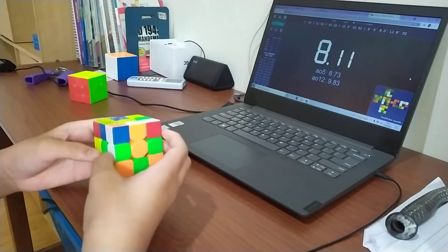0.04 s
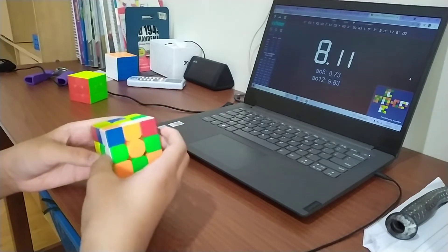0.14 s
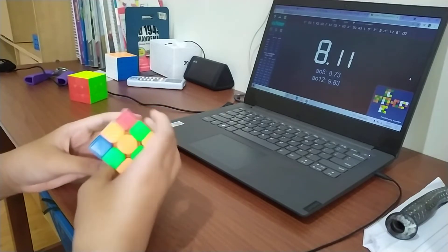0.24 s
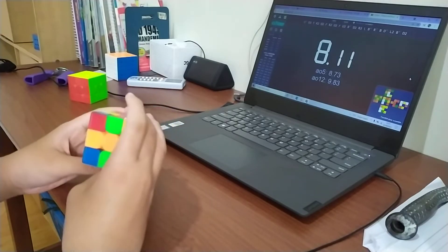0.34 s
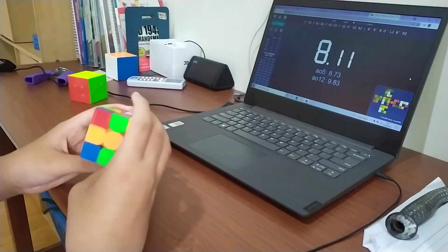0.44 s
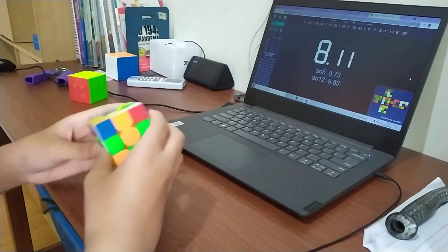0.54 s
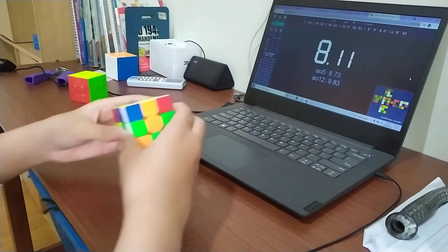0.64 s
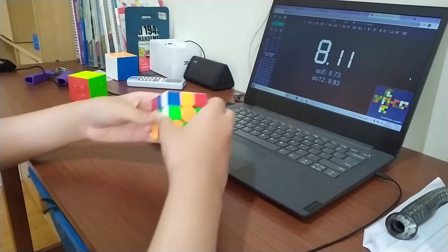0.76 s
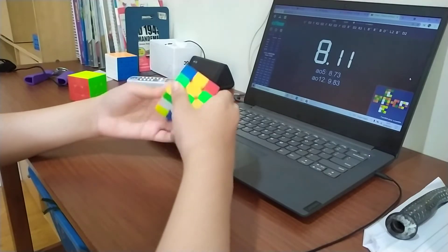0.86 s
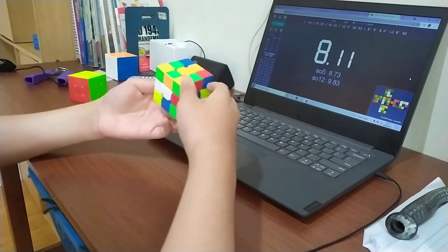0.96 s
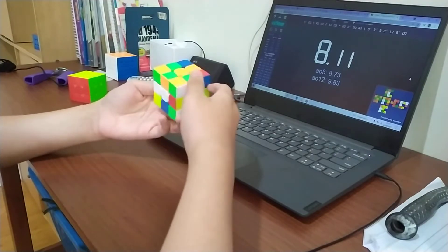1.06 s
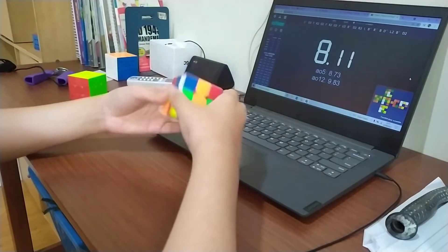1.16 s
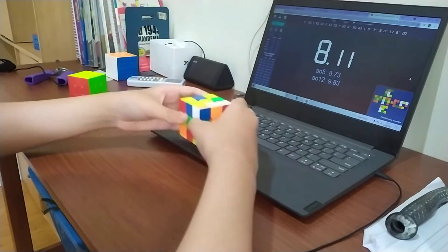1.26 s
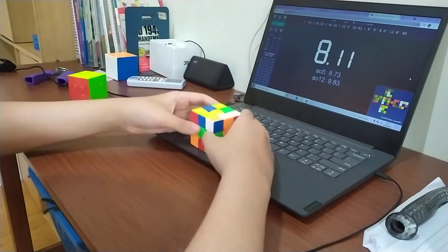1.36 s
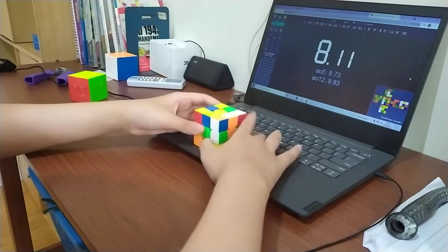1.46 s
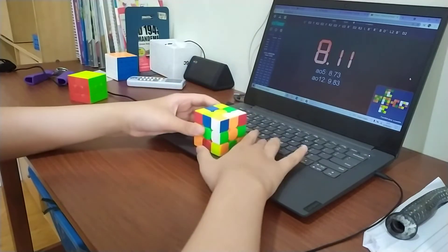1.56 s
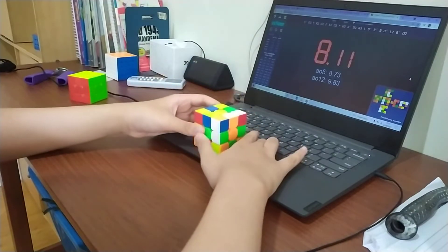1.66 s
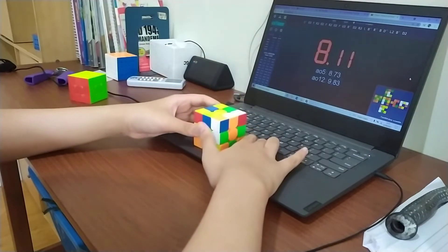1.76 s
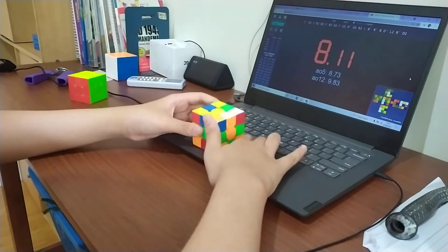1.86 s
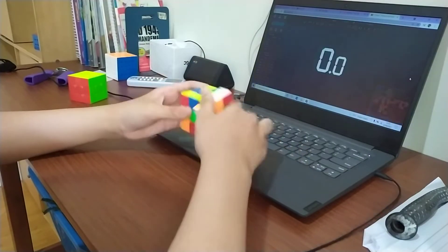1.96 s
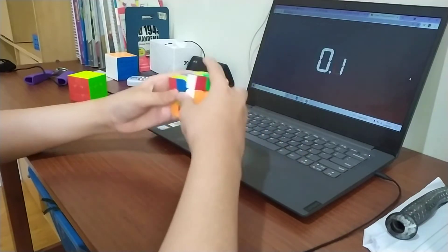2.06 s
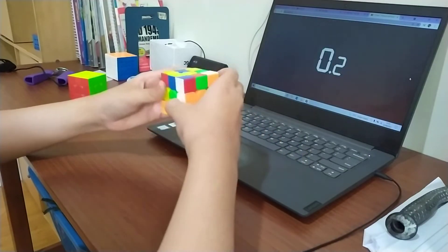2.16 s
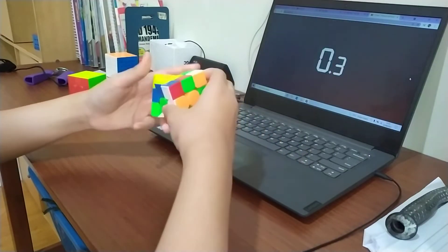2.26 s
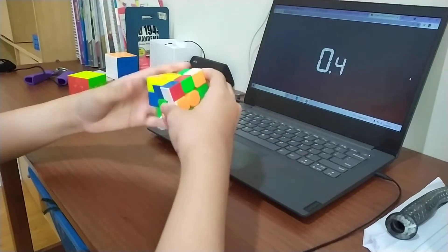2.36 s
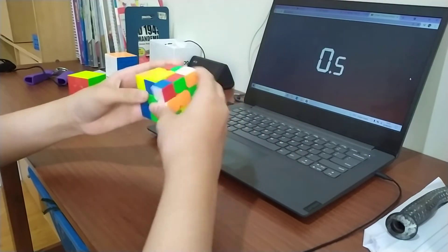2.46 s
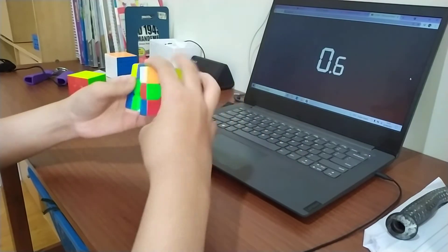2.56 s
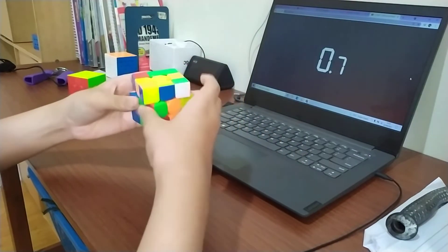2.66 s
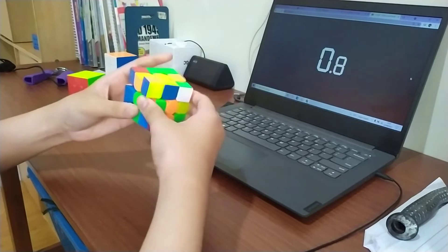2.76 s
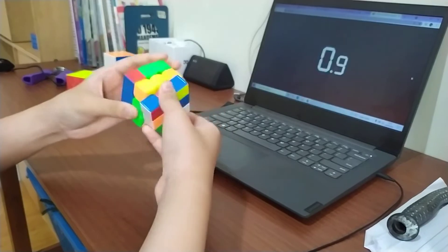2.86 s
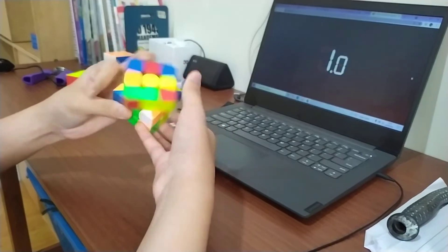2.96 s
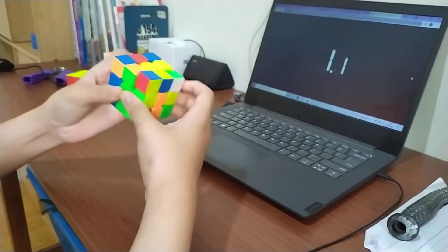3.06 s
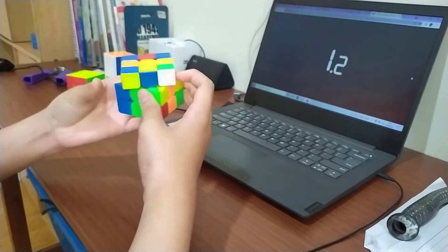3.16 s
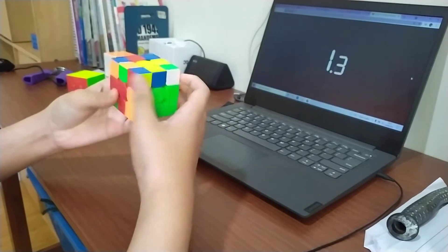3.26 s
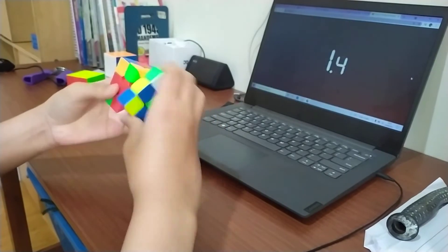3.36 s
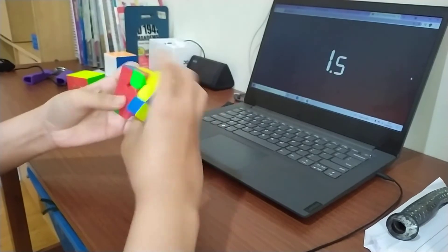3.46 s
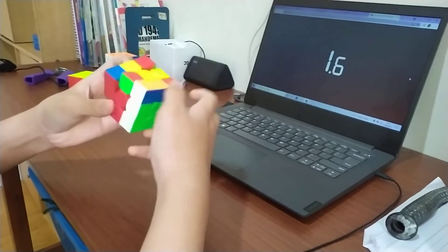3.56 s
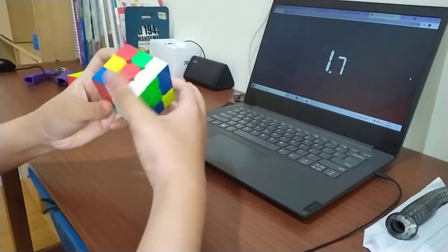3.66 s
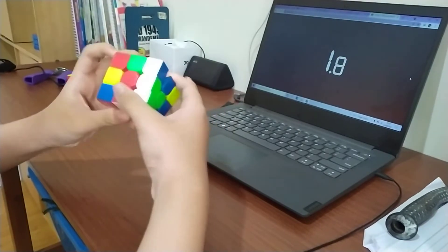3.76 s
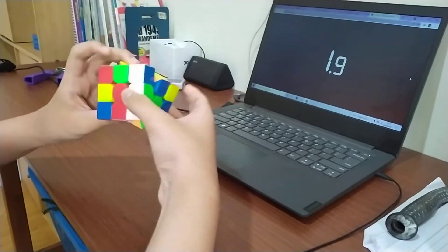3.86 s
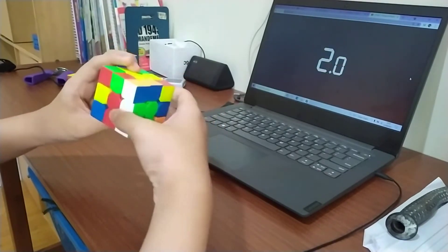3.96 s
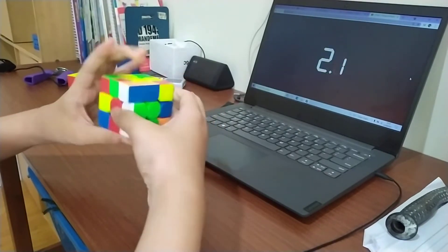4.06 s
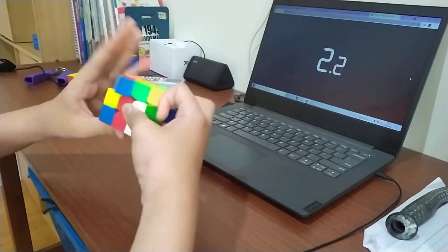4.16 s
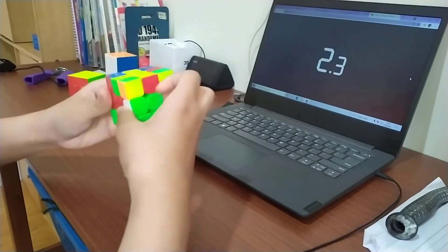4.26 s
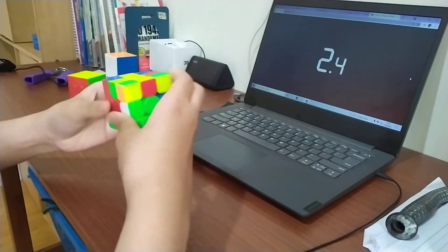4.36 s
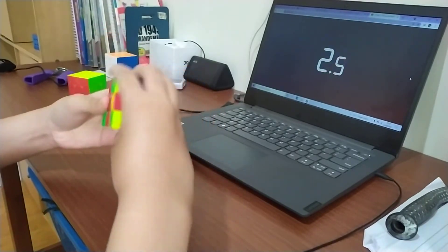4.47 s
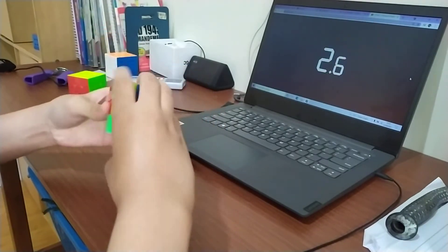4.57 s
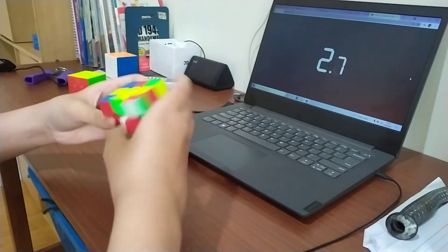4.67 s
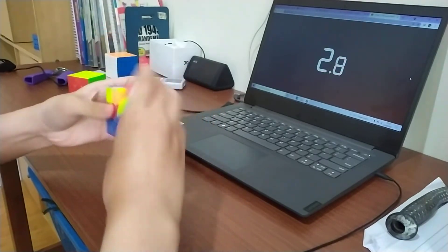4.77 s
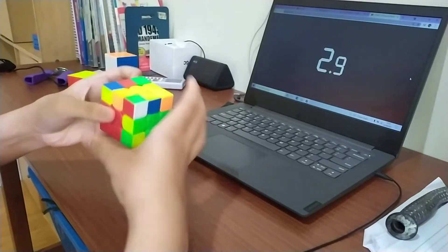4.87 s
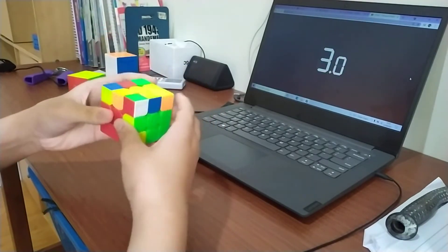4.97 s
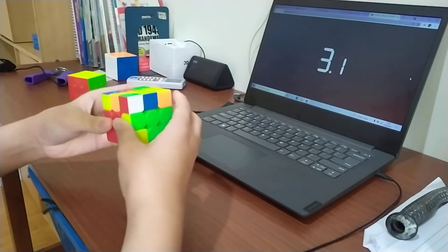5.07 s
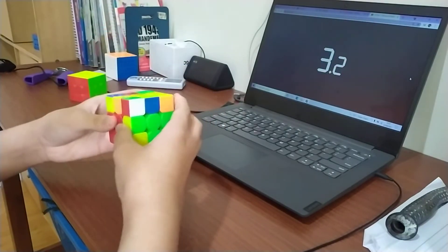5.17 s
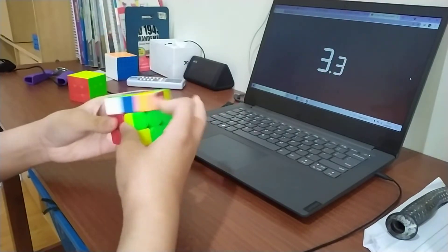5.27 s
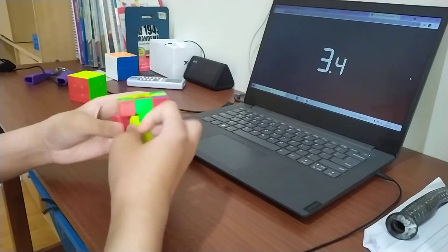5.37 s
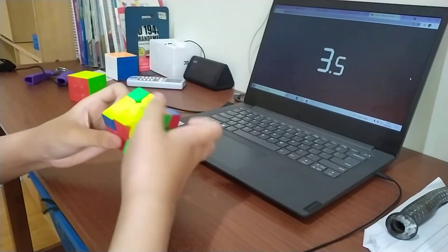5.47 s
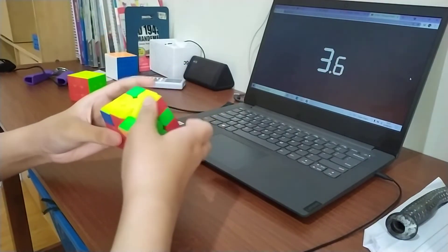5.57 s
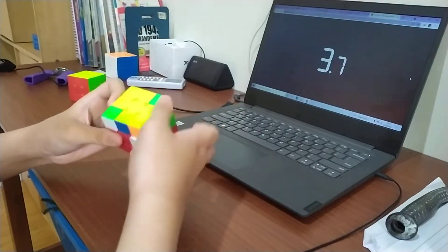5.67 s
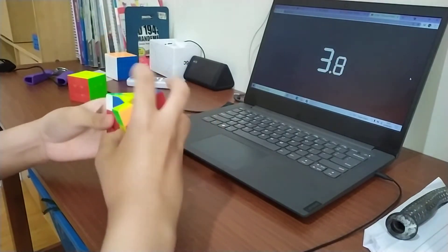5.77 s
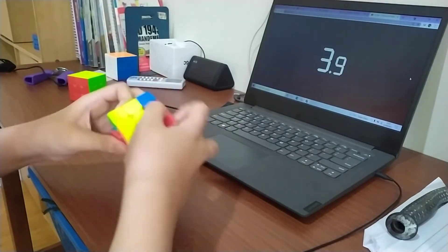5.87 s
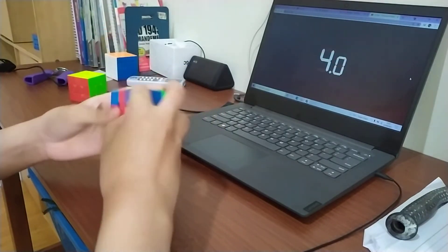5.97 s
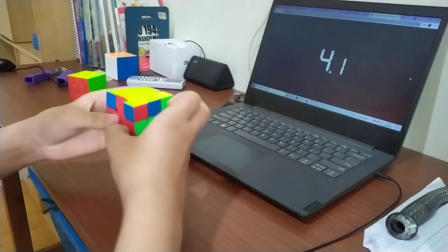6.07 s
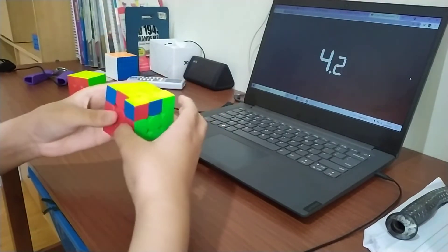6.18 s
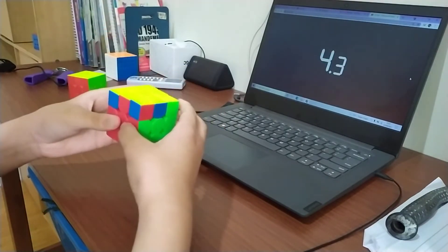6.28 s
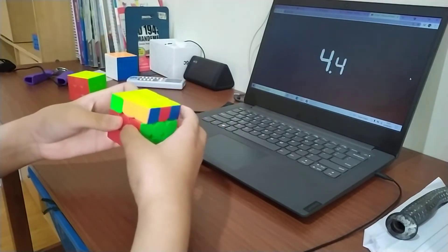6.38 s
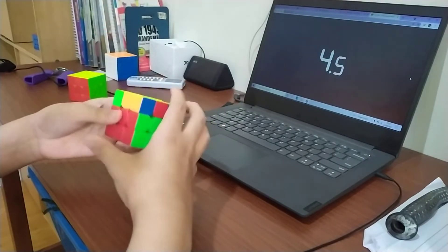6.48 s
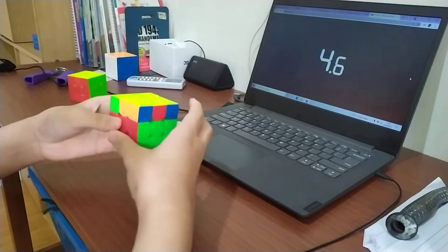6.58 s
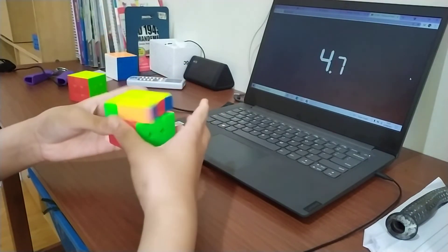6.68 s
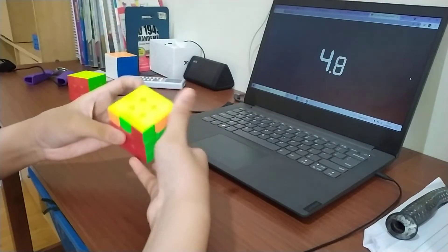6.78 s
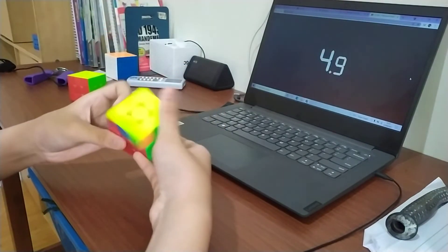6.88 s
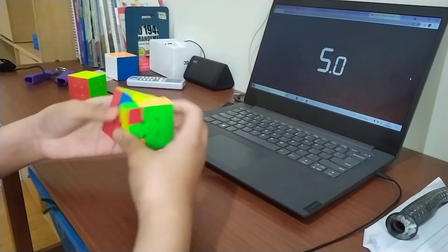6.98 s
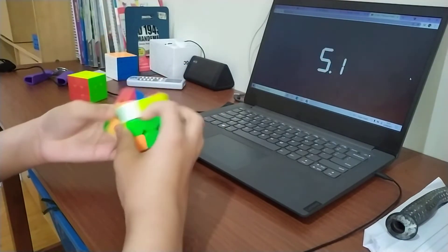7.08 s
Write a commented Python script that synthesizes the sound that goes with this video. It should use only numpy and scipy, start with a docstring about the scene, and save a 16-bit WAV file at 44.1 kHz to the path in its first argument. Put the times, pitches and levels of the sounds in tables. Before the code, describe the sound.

Quiet room rumble and faint hiss first, then a plastic puzzle cube lands on a laptop with a light clack and low thud. After a brief pause with small taps it is picked up and twisted very fast: bright, dry clicks in irregular bursts with short rattles of loose pieces. Close stereo microphone, small hard-walled room with short bright echoes.

```python
"""A plastic puzzle cube is put down on a laptop, picked up again and solved fast in a small hard-walled room.
It clacks as it lands and, later, as its pieces catch and snap home; loose pieces rattle as it is put down
and as layers slide. Both are random tiny impacts ringing through plastic; hard stops ring the cube's core.
The laptop, the desk and the cupped cube thud as ringing modes; wall echoes follow the cube.
Beneath lie room rumble and hiss, faint tones, and a motor that swells once and dies away."""
import sys
import numpy as np
from scipy import signal
from scipy.fft import rfft, irfft
from scipy.io import wavfile

SR = 44100
rng = np.random.default_rng(int(sys.argv[2]) if len(sys.argv) > 2 else 0)


def put_to_file(sound):
    """Save the sound as 16-bit audio at rate SR, in the file named by the first command-line argument."""
    columns = np.atleast_2d(sound).T  # one column per channel
    safe = np.clip(columns, -1, 1)
    whole_steps = np.round(safe * 32767)
    wavfile.write(sys.argv[1], SR, whole_steps.astype(np.int16))


N = 314400
TIME = np.arange(N) / SR
CUTOFF_HZ = 15950   # the recorded sound stops above this


# Clacks of the cube: first landing on the laptop, later pieces snapping home.
# Each row: start in seconds, level in dB (energy gathered in 1 ms, before the mix),
# chatter energy decay in ms, hollow body in dB, level thrown into the room in dB against the clack.
CUBE_CLACKS = [(1.1398, -50, .9, -5, -2), (1.3872, -30, 1.5, 14.5, -4.5), (1.3946, -36, 2.2, 20, 1.5),
               (1.404, -31, 2.8, 21, -10), (1.51, -37.5, 2, -16, 0), (1.5385, -32.5, 2.6, 8.5, -3),
               (1.911, -42, 4.2, -2, 2), (1.9901, -35, 1.5, 11.5, -4), (2.0093, -36, 1.7, 12, 0),
               (2.0198, -37.5, 2, -4, 3.5), (2.1275, -45, 4, 8, 1), (2.2357, -31.5, 1.5, 10, -2.5),
               (2.2602, -27.5, 4.4, 4.5, 1.5), (2.268, -22.5, 1.2, 3.5, -6), (2.2747, -22.5, 1.3, 1, 1),
               (2.2929, -23, 2.4, 2.5, -2), (2.3827, -35, 1, 4, 5.5), (2.428, -27, 4.7, -1.5, 8.5),
               (2.4359, -19, 1.5, -2, -6.5), (2.4668, -22.5, 0.99, -1, -10), (2.511, -27.5, 3.7, 5.5, 5.5),
               (2.5654, -29.5, 4, 3, 3), (2.6489, -21.5, 1.9, 0.5, -1.5), (2.8387, -36, 2.2, 5, 3),
               (2.8795, -34.5, 5.9, -0.5, 1.5), (2.9693, -23.5, 3.5, -1, 0), (2.9825, -15, 0.71, -1.5, 0.5),
               (2.9981, -17.5, 1, 1, 3), (3.151, -30, 2.3, 1.5, 0), (3.242, -22.5, 1.7, -2, -2),
               (3.2607, -23.5, 1.8, -9, -3), (3.3424, -21.5, 1.1, -4, -1), (3.3761, -27, 2, 1, 2),
               (3.4434, -23.5, 3.7, 5.5, 0), (3.4666, -14.5, 1.7, 0, -1.5), (3.5078, -21.5, 3.7, 3, 2.5),
               (3.5266, -21.5, 1.8, -15, 4), (3.6994, -26, 1.2, -1, -4), (3.8048, -33.5, 3.1, 5.5, 0.5),
               (3.823, -36, 2.1, -5, 1), (3.948, -24.5, 1.2, -8, -1), (3.9603, -32, 1.7, -3, 1),
               (4.0827, -35.5, 3.2, 4, 1.5), (4.162, -24.5, 3.6, 3.5, -2.5), (4.2278, -24, 2.1, -2, 6),
               (4.2493, -19, 2.3, -8, -8), (4.265, -22.5, 1.8, 2.5, 0), (4.2849, -20, 1.1, -10.5, -14),
               (4.4624, -22.5, 2.6, 1, -1), (4.4806, -21.5, .8, 5, -5), (4.585, -26, 1.8, -0.5, 4),
               (4.5914, -22, 1.2, 5.5, -4), (4.6536, -26.5, 1.9, 7, -3), (4.6848, -17.5, 1.1, -1.5, -1),
               (4.7188, -13, 2.6, 2.5, -5.5), (4.745, -15, 1.2, -15, 0.5), (4.7656, -16.5, 1.5, -12, 2),
               (4.819, -15.5, 2.4, 2, -2), (4.8431, -15.5, 3, 0.5, -10.5), (4.85, -10.5, 3, -12, -6),
               (5.0357, -31.5, 1.5, -6, -2), (5.2978, -27.5, 2.5, 4.5, -9), (5.3254, -25, 3.2, 0, 1),
               (5.3448, -21.5, 2.2, -2.5, 0.5), (5.3514, -15.5, 1.3, -11.5, -7),
               (5.4594, -23.5, 3.5, 2.5, 3), (5.638, -30, 1.6, -3, 0), (5.6714, -25, 1.8, 1, -4),
               (5.6794, -25.5, 3.6, 2.5, 1.5), (5.7031, -19, 1.2, -4, 1.5), (5.751, -22, 2.3, 4, 2.5),
               (5.81, -27, 0.91, -6, 3.5), (5.8348, -22, 1.2, -17, 5), (5.843, -19, 2, 2.5, 7),
               (5.8499, -7.5, 2, 1, -2.5), (5.978, -18, 3.2, -4.5, 0), (5.982, -17, 2.9, 10.5, -7.5),
               (6.25, -27, 1.3, 0.5, -1.5), (6.3709, -24, 2.7, 5.5, 1.5), (6.3909, -22.5, 1.9, -6.5, -1),
               (6.4553, -30, .7, -9, -6), (6.697, -26, 1.4, -3.5, -4.5), (6.734, -20.5, 2.3, -19, -1.5),
               (6.7654, -32.5, 1.4, 11.5, -3.5), (6.8061, -30, 1.6, -9, -4), (6.88, -36, 1.5, 4, 2.5),
               (6.905, -25, 8.1, 0.5, -2), (6.9312, -26, 1.6, 7.5, -5), (6.98, -25, 2.8, 3.5, -0.5),
               (7.0276, -19.5, 1.1, 1, -2), (7.0414, -15, 1.5, 5, -5.5), (7.0679, -12.5, 3.2, 2, 0.5)]


def clacks(left_db=-0.3, pan_spread_db=0.9):
    """The cube clacks, each time leaning its own way in stereo; a loose piece then settles with a faint tick.

    Gives two sounds: the direct one and the one thrown at the walls.
    """
    settle_from_s, settle_to_s = .008, .05
    settle_db, settle_chatter_ms = -15, 1
    direct, thrown = np.zeros((2, 2, N))
    for start_s, db, decay_ms, body_db, thrown_db in CUBE_CLACKS:
        left_minus_right_db = left_db + pan_spread_db * rng.standard_normal()
        pan = from_db(np.array([[.5], [-.5]]) * left_minus_right_db)
        settle_s = settle_from_s + (settle_to_s - settle_from_s) * rng.random()
        edge_db = brightness(start_s)
        main_clack = from_db(db) * clack(decay_ms, body_db, edge_db)
        tick = from_db(db + settle_db) * clack(settle_chatter_ms, body_db, edge_db)
        for at_s, sound in (start_s, main_clack), (start_s + settle_s, tick):
            add(direct, at_s, sound * pan)
            add(thrown, at_s, sound * from_db(thrown_db))
    return direct, thrown


def clack(decay_ms, body_db, edge_db, rise_ms=0.22, snap_ms=0.6, uneven_db=2.0, size=1400):
    """A sharp knock of plastic on plastic, after which the pieces chatter for a few milliseconds."""
    ms = np.arange(size) * 1000 / SR
    snap = np.exp(-ms / (2 * snap_ms))
    # a longer chatter is also a stronger one: 6.5 dB is its weight before its length scales it
    chatter = from_db(6.5) * decay_ms * np.exp(-ms / (2 * max(decay_ms, .3)))
    envelope = (1 - np.exp(-ms / rise_ms)) * np.hypot(snap, chatter / 2)
    force = contacts(size, per_s=14000, spread_db=2.5, alike=0.41) * envelope
    sound = plastic(force, body_db, edge_db, uneven_db)
    # same total energy for every clack, as if gathered in 1 ms
    return sound * np.sqrt(SR / 1000 / np.sum(sound ** 2, axis=1, keepdims=True))


# Loose pieces rattling, first as the cube is put down, then as layers slide.
# Each row: start in seconds, end in seconds, level in dB before the mix.
PIECE_RATTLES = [(1.387, 1.413, -55.5), (2.534, 2.615, -55.5), (2.962, 3.048, -40), (3.241, 3.276, -44),
                 (3.441, 3.543, -39.5), (4.117, 4.2, -44), (4.229, 4.287, -45.5), (4.46, 4.575, -48.5),
                 (4.581, 4.597, -38), (4.707, 4.796, -31.5), (4.8, 4.871, -30), (5.29, 5.35, -44.5),
                 (5.395, 5.458, -52), (5.471, 5.503, -33.5), (5.835, 5.865, -34.5), (5.922, 6.01, -39),
                 (6.361, 6.407, -45), (6.718, 6.785, -43), (6.9, 7.025, -51.5), (7.055, 7.123, -37.5)]


def rattles(uneven_db=1.5, rattle_db=2.0, rattle_per_s=450):
    """Loose pieces scrape and rattle in dense uneven clumps, each rattle growing slightly to its end."""
    body_db, extra_edge_db = -0.5, 1.5
    grows_db = 1   # a turning layer gathers speed; every rattle grows by this much
    out = np.zeros((2, N))
    for start_s, end_s, db in PIECE_RATTLES:
        size = max(int((end_s - start_s) * SR), 200)
        steps = rng.standard_normal(200).clip(-2, 2)
        clumps = from_db(rattle_db * np.interp(TIME[:size] * rattle_per_s, np.arange(200), steps))
        growth = from_db(np.linspace(0, grows_db, size))
        force = contacts(size, per_s=900, spread_db=7, alike=0.26) * clumps * growth
        sound = plastic(force, body_db, brightness(start_s) + extra_edge_db, uneven_db)
        # the level is raised by the root of the ringing sound's length over the rattle's own, so short rattles
        # come out several dB louder
        level = np.sqrt(sound.shape[1] / size) * from_db(db)
        add(out, start_s, unit(sound) * level)
    return out


# The cube's top treble, which changes from grip to grip. Each row: time in seconds, level in dB.
GRIP_TREBLE = [(1.14, -15), (1.39, 6.5), (1.92, 7), (2.03, -8), (2.27, 4), (2.44, -1), (2.88, 1), (2.98, 3),
               (3.35, 4.5), (3.52, 0.5), (3.82, -4), (3.95, -0.5), (4.23, -0.5), (4.48, -1), (4.8, 3.5),
               (5.04, -6), (5.35, 2), (7.1, 4)]


def brightness(s):
    """Level of the top treble in dB at time s, read between the grips."""
    return np.interp(s, *np.transpose(GRIP_TREBLE))


def contacts(size, per_s, spread_db, alike):
    """Random tiny impacts of uneven strength, partly shared by the left and right channels."""
    hit = rng.random((3, size)) < per_s / SR
    sign = rng.choice([-1, 1], (3, size))
    strength = from_db(spread_db * rng.standard_normal((3, size)).clip(-2, 2))
    shared, left, right = hit * sign * strength
    alike = np.clip(alike, 0, 1)
    return unit(np.sqrt(alike) * np.array([shared, shared]) + np.sqrt(1 - alike) * np.array([left, right]))


# Colour of the cube's plastic. Each row: frequency in Hz, level in dB per Hz.
PLASTIC_COLOUR = [(200, -32.5), (500, -25), (830, -18.5), (1080, -12), (1550, -7.5), (1900, -11.5),
                  (2700, -10.5), (3900, -9), (5200, -3.5), (6600, -0.5), (8600, 1), (10300, -2),
                  (12000, -10), (15800, -12)]
# Where the hollow body sounds. Each row: frequency in Hz, share from 0 to 1.
HOLLOW_BODY = [(1500, 1), (2600, 0.6), (5000, 0)]
# Where the thin edges sound. Each row: frequency in Hz, share from 0 to 1.
THIN_EDGES = [(8500, 0.017), (12500, 0.98)]


def plastic(force, body_db, edge_db, uneven_db, size=1024, count=70):
    """Contacts ring through the cube; each time it has its own uneven set of short resonances."""
    hz = np.fft.rfftfreq(size, 1 / SR)
    db = at_hz(PLASTIC_COLOUR, hz) + body_db * at_hz(HOLLOW_BODY, hz) + edge_db * at_hz(THIN_EDGES, hz)
    bumps_hz = np.linspace(0, SR / 2, count)
    db = db + uneven_db * np.interp(hz, bumps_hz, rng.standard_normal(count))
    db = db - 30 * (hz > CUTOFF_HZ)
    # minimum phase: nothing rings before the contact
    cepstrum = irfft(np.log(from_db(db)))
    fold = 1 + np.sign(size // 2 - np.arange(size))
    fold[0] = 1
    ringing = irfft(np.exp(rfft(cepstrum * fold)))
    return signal.fftconvolve(force, ringing[None], axes=1)


# Hard stops that reach the cube's core. Each row: start in seconds, level in dB, contact softness in Hz.
HARD_STOPS = [(4.719, -46, 2000), (4.82, -55, 2000), (4.85, -61, 2000), (5.851, -47.5, 1800),
              (5.871, -50, 1800), (5.983, -51, 2000)]
# The hollow cube as a whole. Each row: frequency in Hz, level in dB, time to fall 60 dB in seconds.
CORE_MODES = [(502, -9.5, 0.092), (654, -21, .06), (810, -9, 0.023), (1070, -10, .04), (1285, -7, .04),
              (1420, -4, .04), (1600, 6, .07), (1850, -12, .03)]


def core_clunks():
    """Hard stops set the whole hollow cube ringing."""
    return knocks(HARD_STOPS, CORE_MODES)


# Blows on laptop and desk. Each row: start in seconds, level in dB, contact softness in Hz.
DESK_BLOWS = [(1.389, -49.5, 1500), (1.404, -42.5, 900), (1.418, -37, 200), (1.537, -45, 300),
              (1.914, -44, 170)]
# The laptop on the desk. Each row: frequency in Hz, level in dB, time to fall 60 dB in seconds.
DESK_MODES = [(62, -17, 0.2), (107.8, 2.5, 0.44), (129.7, -6.5, 0.41), (150.2, 0, 0.43), (241, -2.5, 0.12),
              (312.4, -6.5, 0.28), (393, -11, 0.28), (584, -11, 0.21), (690, -0.5, 0.1), (760, 0.5, 0.11)]


def desk_thuds():
    """Blows set the laptop and the desk ringing at low frequencies."""
    return knocks(DESK_BLOWS, DESK_MODES)


# The palm bumping the cube. Each row: start in seconds, level in dB, contact softness in Hz.
PALM_BLOWS = [(6.364, -52.5, 900), (6.39, -49, 600)]
# The cube cupped in the hands. Each row: frequency in Hz, level in dB, time to fall 60 dB in seconds.
CUPPED_MODES = [(194.1, -5, 0.75), (245, 0.5, .25), (318, -1.5, 0.23), (400, -12, 0.142)]


def palm_bumps():
    """A palm bumps the cube, which rings low inside the cupped hands."""
    return knocks(PALM_BLOWS, CUPPED_MODES)


def knocks(blows, modes, uneven_db=2.1, detune=0.015):
    """Blows set a body's modes ringing; the softer the contact (lower Hz), the weaker the high modes."""
    out, t = np.zeros((2, N)), TIME[:SR // 2]
    for start_s, db, soft_hz in blows:
        ring = 0
        for hz, mode_db, t60 in modes:
            level = from_db(db + mode_db + uneven_db * rng.standard_normal())
            strength = level / (1 + (hz / soft_hz) ** 2)
            tuned_hz = hz * (1 + detune * rng.standard_normal())
            ring = ring + strength * from_db(-60 * t / t60) * np.sin(2 * np.pi * tuned_hz * t)
        add(out, start_s, np.array([ring, ring]))
    return out


def room(x, size=8820):
    """The hands keep moving the cube, so every fifth of a second it meets a new pattern of echoes."""
    out = np.zeros((2, N))
    for i in range(0, N, size):
        add(out, i / SR, signal.fftconvolve(x[:, i:i + size], wall_echoes(), axes=1))
    return out


# How echoes fade. Each row: frequency in Hz, time to fall 60 dB in seconds (negative: they grow instead).
ECHO_FADE = [(300, -0.46), (1300, 0.52), (3500, 0.35), (8000, 0.43), (15000, 0.25)]
# How loud echoes are. Each row: frequency in Hz, level in dB against the sound sent to the walls.
ECHO_LEVEL = [(300, -3.2), (1500, -0.8), (4000, 3), (8000, -1.7), (15000, -2.5)]


def wall_echoes(build_s=0.0031, first_s=0.003, count=9, size=28672):
    """Echoes thicken over milliseconds into a fading tail; the two lowest bands grow until it ends."""
    t, hz = TIME[:size], np.fft.rfftfreq(size, 1 / SR)
    noise = rfft(diffuse(size))
    centres = np.geomspace(300, CUTOFF_HZ, count)
    response = 0
    for centre, pick in zip(centres, np.eye(count)):
        band = irfft(noise * at_hz(np.c_[centres, pick], hz))
        build_up = 1 - np.exp(-np.maximum(t - first_s, 0) / build_s)
        shape = build_up * from_db(-60 * t / at_hz(ECHO_FADE, centre))
        level = from_db(at_hz(ECHO_LEVEL, centre)) / np.sqrt(2 * np.sum(shape ** 2))
        response = response + band * shape * level
    return response


# Room rumble and hiss. Each row: frequency in Hz, relative level in dB per Hz.
ROOM_NOISE = [(25, -6.5), (50, -12), (85, -2), (140, -8), (205, -8.5), (270, -12.5), (390, -13),
              (520, -19.5), (690, -19.5), (820, -24), (1400, -30), (4100, -35), (10000, -35.5),
              (16000, -43)]
# Colour of the motor's rumble. Each row: frequency in Hz, relative level in dB per Hz.
MOTOR_RUMBLE = [(30, -31), (65, 3.5), (100, -10), (160, 1), (260, -14.5), (400, -7.5), (520, -36),
                (1000, -24), (4000, -72)]
# Tones of mains and fan. Each row: frequency in Hz, rms level in dB.
MAINS_AND_FAN = [(49, -65.5), (393, -80), (689, -78.5)]
# A distant motor draws near and recedes: its rumble, its hum and the hum's octave each swell once.
# Each holds: peak time in seconds, peak rms level in dB, rise in dB per second, fall in dB per second,
# resting rms level in dB.
RUMBLE_RISE_AND_FALL = (3, -55.5, 20, 4.5, -74.5)
HUM_RISE_AND_FALL = (3, -58.5, 47, 4, -70)
OCTAVE_RISE_AND_FALL = (2.5, -68.5, 29, 8, -83.5)


def background(waver=0.51, waver_per_s=6):
    """Room noise, mains and fan tones, and a motor whose hum swells; all tones waver slightly in phase."""
    motor_hz, noise_db = 199.8, -58.5
    phase = waver * np.interp(TIME * waver_per_s, np.arange(100), rng.standard_normal(100))   # radians
    angle = 2 * np.pi * motor_hz * TIME + phase
    hum = swell(*HUM_RISE_AND_FALL) * np.sin(angle)
    hum = hum + swell(*OCTAVE_RISE_AND_FALL) * np.sin(2 * angle)
    tones = 0
    for hz, db in MAINS_AND_FAN:
        start_phase = rng.uniform(0, 2 * np.pi)
        tones = tones + from_db(db) * np.sin(2 * np.pi * hz * TIME + start_phase + phase * .5)
    rumble = swell(*RUMBLE_RISE_AND_FALL) * coloured(MOTOR_RUMBLE)
    room_noise = from_db(noise_db) * coloured(ROOM_NOISE)
    return room_noise + rumble + np.sqrt(2) * (hum + tones)   # root 2 turns rms into sine peaks


def swell(peak_s, peak_db, rise_db_per_s, fall_db_per_s, rest_db):
    """Gain that rises from a resting level to one peak and dies away again."""
    below_db = np.maximum((peak_s - TIME) * rise_db_per_s, (TIME - peak_s) * fall_db_per_s)
    return np.hypot(from_db(peak_db - below_db), from_db(rest_db))


def coloured(spectrum):
    """Diffuse noise with a given spectrum, rms 1."""
    gain = from_db(at_hz(spectrum, np.fft.rfftfreq(N, 1 / SR)))
    return unit(irfft(rfft(diffuse(N)) * gain, N))


# How alike the two channels are in sound from all sides. Each row: frequency in Hz, correlation.
CHANNEL_LIKENESS = [(100, 0.91), (250, 0.913), (500, 0.6), (1000, -0.042), (2000, 0.045), (4000, 0.043),
                    (12000, 0.0022)]


def diffuse(size):
    """White stereo noise arriving from all sides: alike in the bass, nearly unrelated in the treble."""
    mid, side = rfft(rng.standard_normal((2, size)))
    alike = np.clip(at_hz(CHANNEL_LIKENESS, np.fft.rfftfreq(size, 1 / SR)), -.99, .99)
    return irfft(np.sqrt(1 + alike) * mid + np.sqrt(1 - alike) * side * [[1], [-1]], size)


def from_db(db):
    """Decibels to gain."""
    return 10 ** (np.asarray(db) / 20)


def unit(x):
    """Scale to rms 1."""
    return x / np.sqrt(np.mean(x ** 2) + 1e-20)


def at_hz(points, hz):
    """Read a table on a log-frequency axis."""
    f, value = np.transpose(points)
    return np.interp(np.log(np.maximum(hz, 1)), np.log(f), value)


def add(out, s, sound):
    """Mix a stereo sound in at time s."""
    i = int(s * SR)
    out[:, i:i + sound.shape[1]] += sound[:, :N - i]


def scene(direct_db=0.28, room_left_db=-0.42, room_right_db=-0.5):
    """The cube close to the microphone, its room, the desk and the background."""
    left_lag_s, rattle_room_db = 7 / SR, -2
    snaps, thrown = clacks()
    rattle = rattles()
    stops = core_clunks()
    left, right = (snaps + rattle + stops) * from_db(direct_db)
    # the cube's direct sound reaches the left side a little later
    direct = np.array([np.interp(TIME - left_lag_s, TIME, left), right])
    to_walls = thrown + rattle * from_db(rattle_room_db) + stops
    walls = room(to_walls) * from_db([[room_left_db], [room_right_db]])
    return direct + walls + desk_thuds() + palm_bumps() + background()


def record(dry, port_hz=10000, port_share=0.3):
    """The left port is a little brighter than the right; peaks are rounded, deepest bass and top are cut."""
    treble = signal.sosfilt(signal.butter(1, port_hz, "high", fs=SR, output="sos"), dry)
    heard = dry + port_share * treble * [[.5], [-.5]]
    rounded = .6 * np.tanh(heard / .6)
    thin = signal.sosfilt(signal.butter(6, 42, "high", fs=SR, output="sos"), rounded)
    return signal.sosfilt(signal.ellip(10, .2, 70, CUTOFF_HZ, fs=SR, output="sos"), thin)


dry = scene()
out = record(dry)
put_to_file(out)
```